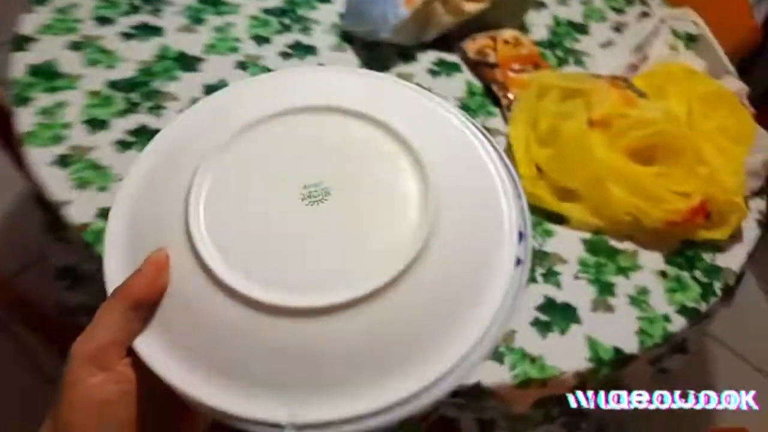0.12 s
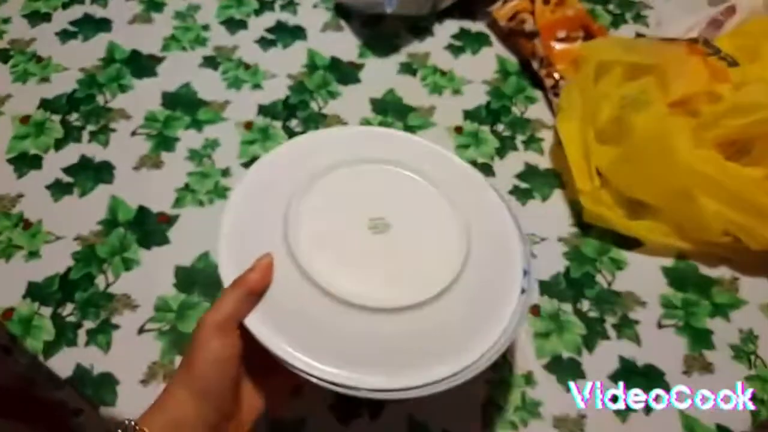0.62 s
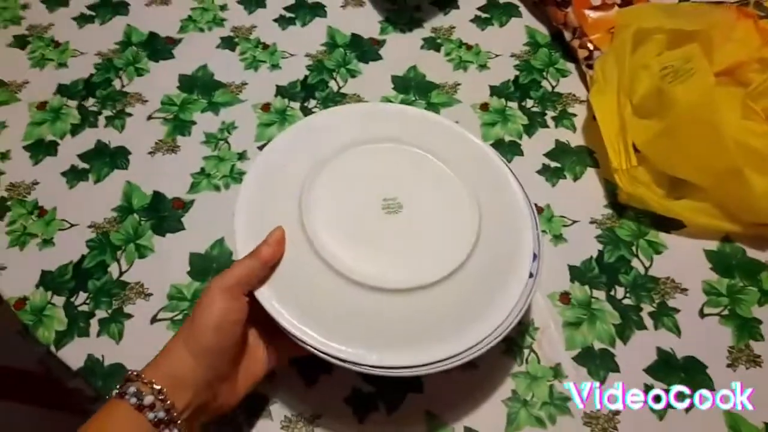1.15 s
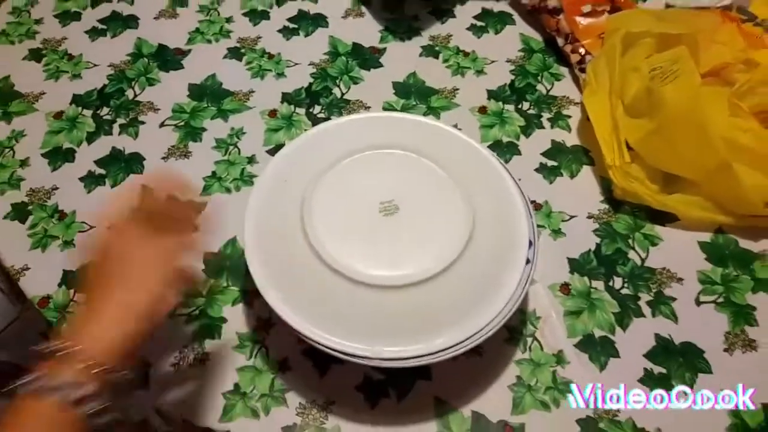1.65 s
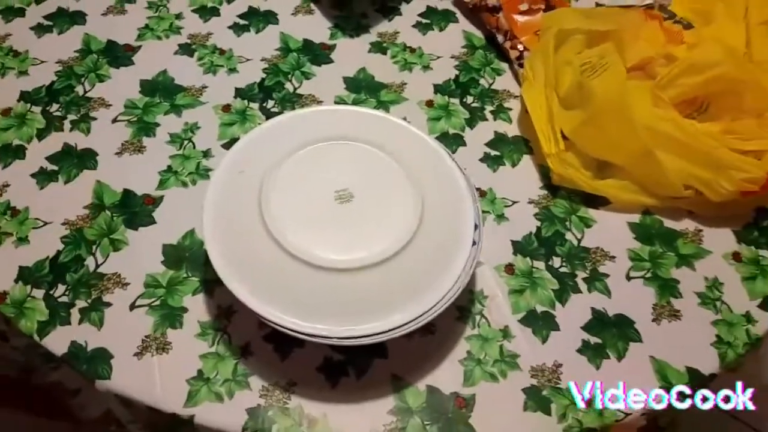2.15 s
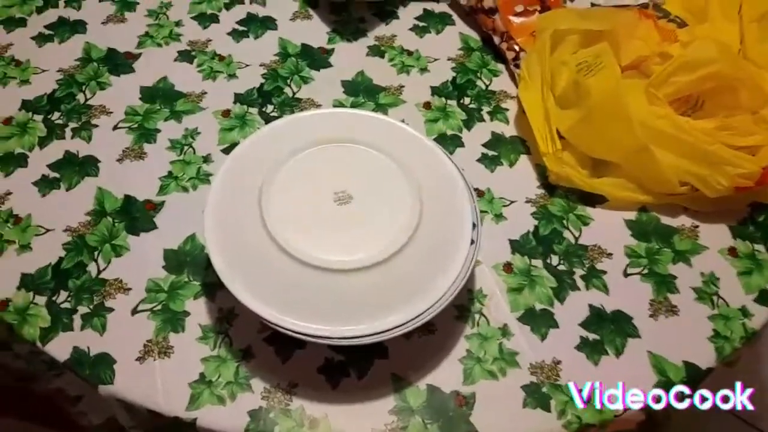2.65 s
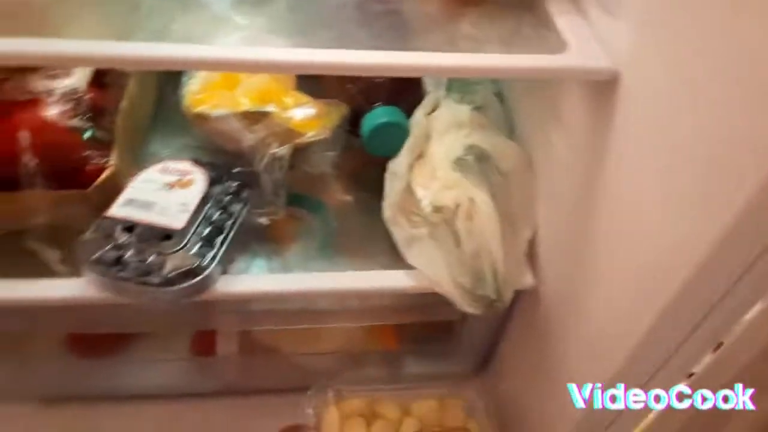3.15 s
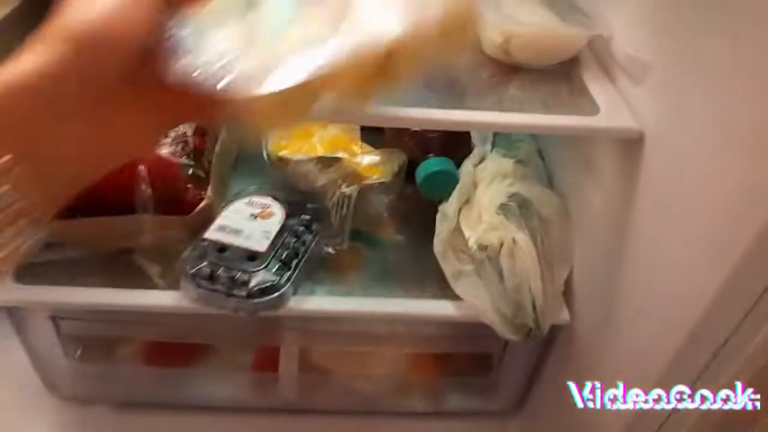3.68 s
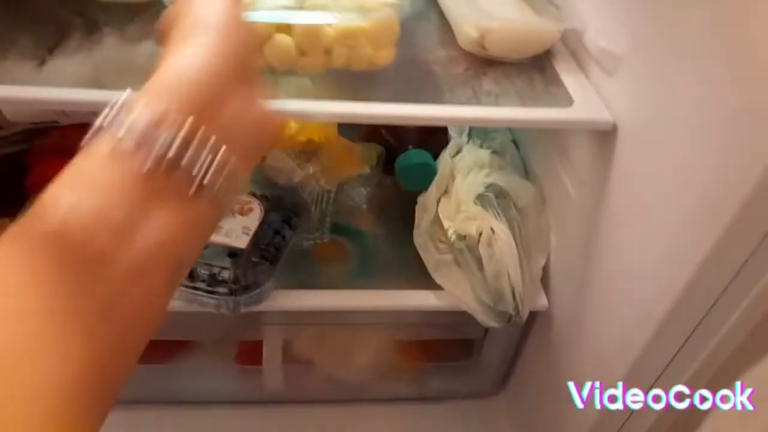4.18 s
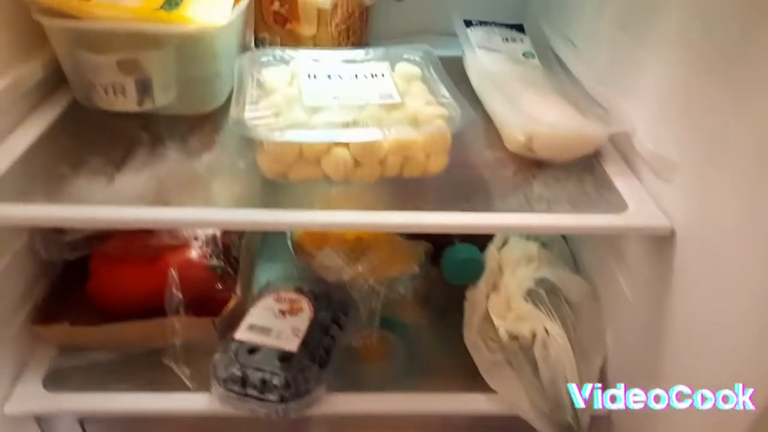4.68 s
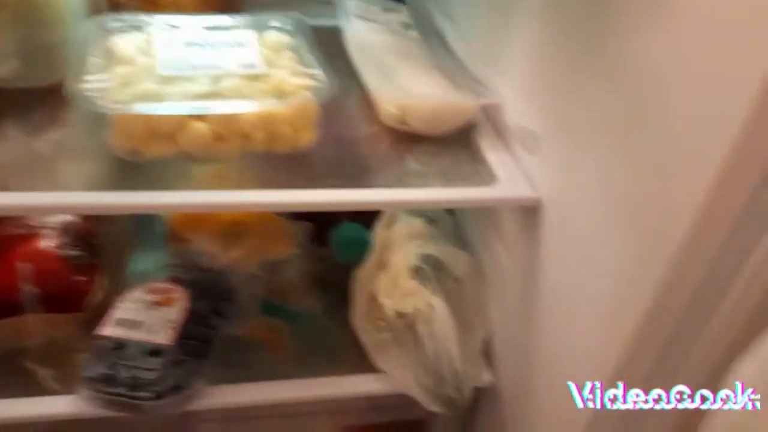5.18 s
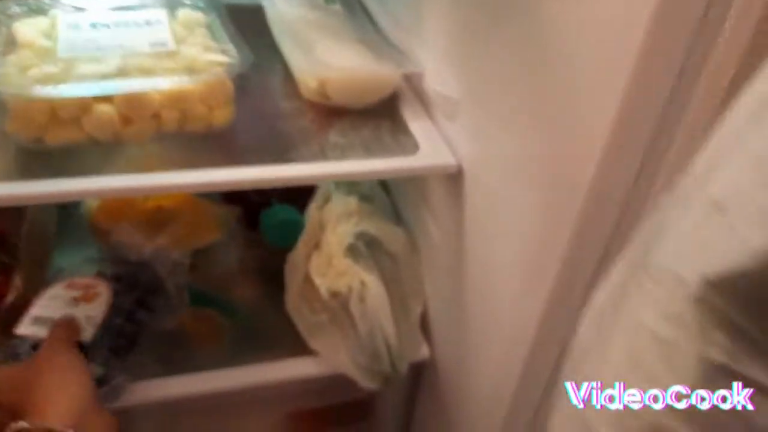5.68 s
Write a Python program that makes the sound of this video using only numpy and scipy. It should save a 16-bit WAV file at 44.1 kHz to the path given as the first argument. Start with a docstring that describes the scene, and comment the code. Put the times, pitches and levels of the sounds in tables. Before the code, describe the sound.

In a home kitchen, close handheld stereo microphone: a soft puff of air and rubbing, then a small stack of plates thuds onto a cloth-covered table, drags briefly and clacks sharply. Tiny bracelet beads tick. A short total silence follows, then a louder low fridge hum with a thin plastic tray crackling, knocking onto a shelf twice, and settling into near-quiet humming with a few faint late ticks.

```python
"""A puff of air and soft rubbing over a faint hum: a small stack of plates swings down, lands on a covered
table, drags and clacks; bracelet beads tick. After a short silence, at an open humming fridge, a plastic
tray crackles and is bumped onto a shelf. Blows ring decaying modes, ticks and snaps are resonant noise
bursts, friction and air are shaped noise, the hum is wavering sines. Two spaced microphone ports."""
import sys
import numpy as np
from scipy import signal
from scipy.fft import rfft, irfft, next_fast_len
from scipy.io import wavfile
from scipy.ndimage import map_coordinates

SR = 44100
rng = np.random.default_rng(int(sys.argv[2]) if len(sys.argv) > 2 else 0)


def ratio(d):
    """dB to gain"""
    e = np.asarray(d, float) / 20
    return 10 ** e


def put_to_file(sound):
    """Save the sound as 16-bit audio at rate SR, in the file named by the first command-line argument."""
    columns = np.atleast_2d(sound).T  # one column per channel
    safe = np.clip(columns, -1, 1)
    whole_steps = np.round(safe * 32767)
    wavfile.write(sys.argv[1], SR, whole_steps.astype(np.int16))


N = 256662


def unit(x):
    """Scaled to rms 1."""
    return x / np.sqrt(np.mean(x ** 2) + 1e-20)


def peak(x):
    """Scaled to peak 1."""
    return x / np.abs(x).max()


def along(points, hz):
    """(Hz, value) points read on a log axis."""
    f, v = np.transpose(points)
    return np.interp(np.log(hz + 1), np.log(f + 1), v)


def wobble(rate_hz):
    """Smooth random curve, rate_hz knots a second."""
    knots = rng.standard_normal(int(N * rate_hz / SR) + 4)
    return map_coordinates(knots, [np.arange(N) * rate_hz / SR])


def filtered(x, response):
    """x times a response of frequency."""
    m = next_fast_len(x.shape[-1] + 8192)
    spectrum = rfft(x, m) * response(np.fft.rfftfreq(m, 1 / SR))
    return irfft(spectrum, m)[..., :x.shape[-1]]


def add(track, s, sound):
    """Lay a sound into a track at time s."""
    at = round(s * SR)
    track[..., at:at + sound.shape[-1]] += sound[..., :N - at]


def resonances(peaks):
    """Causal response of (Hz, width Hz, dB) resonances, signs alternating."""
    def response(f):
        total = 0
        for k, (centre, width, db) in enumerate(peaks):
            total = total + (-1) ** k * ratio(db) * 1j * f * width / (centre ** 2 - f * f + 1j * f * width)
        return total
    return response


def strokes(rows):
    """Summed gains, one per dB column: each stroke swells to its peak and fades at steady dB rates."""
    t, total = np.arange(N) / SR, 0
    for s, *dbs, rise_s, fall_s in rows:
        shape_db = 20 * np.minimum((t - s) / max(rise_s, .002), (s - t) / max(fall_s, .002))
        total = total + ratio(np.array(dbs))[:, None] * ratio(np.maximum(shape_db, -200))
    return total


def ring(modes, level_db, attack_s):
    """Decaying modes, peak 1, each struck at a slightly new strength."""
    t = np.arange(SR // 2) / SR
    hz, db, t60 = np.transpose(modes)[:, :, None]
    db = db + level_db(hz) + rng.normal(0, 1.5, hz.shape)
    tones = ratio(db - 60 * t / t60) * np.sin(2 * np.pi * hz * t)
    return peak(tones.sum(0) * (1 - np.exp(-t / attack_s)) ** 2)


def click(centre_hz, t60_s, width):
    """Short noise burst through one resonance taken twice; width relative to centre."""
    t = np.arange(SR // 10) / SR
    decay = ratio(-60 * t / max(t60_s, .002))
    burst = decay * (1 - np.exp(-t / .0011)) * rng.standard_normal(len(t))
    band = resonances([(centre_hz, width * centre_hz, 0)])
    return peak(filtered(burst, lambda hz: band(hz) ** 2))


# left-right likeness of diffuse sound: f/Hz, likeness/1
LIKENESS = [(150, 0.99), (300, 0.71), (640, 0.16), (1300, 0.0), (12000, 0.0)]


def ports(pair):
    """Two unrelated signals mixed so that the ports share bass but not treble."""
    turn = lambda hz: np.arccos(np.clip(along(LIKENESS, hz), -1, 1)) / 2
    mid, side = filtered(pair, lambda hz: np.array([np.cos(turn(hz)), np.sin(turn(hz))]))
    return np.array([mid + side, mid - side])


def rush(spectrum, grain_db=0):
    """Diffuse noise of rms 1; grain makes it gritty."""
    grit = ratio(grain_db * wobble(460))
    noise = ports(grit * rng.standard_normal((2, N)))
    return unit(filtered(noise, lambda hz: ratio(along(spectrum, hz))))


# kitchen decay: f/Hz, t60/s
KITCHEN_T60 = [(150, .45), (1000, 0.49), (5000, 0.43), (14000, 0.3)]


def placed(x, wet_db, scatter_db, pan_db=0, lag_s=0):
    """Direct sound, scatter off hand and nearby surfaces (opposite at the ports), and kitchen tail."""
    pan = ratio([[pan_db / 2], [-pan_db / 2]])
    lag = lambda hz: np.exp(1j * np.pi * hz * lag_s * np.array([[-1], [1]]))
    out = filtered(x, lambda hz: pan * lag(hz))
    step, t = SR // 4, np.arange(SR // 50) / SR
    for at in range(0, N, step):  # scatter and tail drawn anew every quarter second
        if np.abs(x[at:at + step]).max() > 1e-5:
            hz, frames_s, z = signal.stft(rng.standard_normal((2, SR // 2)), SR, nperseg=256)
            decay = ratio(-60 * frames_s / along(KITCHEN_T60, hz)[:, None])
            tail = ports(signal.istft(z * decay, SR, nperseg=256)[1])
            tail *= ratio(wet_db) / np.linalg.norm(tail[0])
            scatter = rng.standard_normal(len(t)) * ratio(-60 * t / .006)
            scatter /= np.linalg.norm(scatter)
            scatter = filtered(scatter, lambda hz: (1j * hz / (450 + 1j * hz)) ** 2)
            tail[:, :len(t)] += ratio(scatter_db) * scatter * [[1], [-1]]
            add(out, at / SR, signal.fftconvolve(x[None, at:at + step], tail, axes=1))
    return out


def hum(lines, waver_db, drift_rad):
    """Motor tones that waver in level and phase."""
    t, total = np.arange(N) / SR, 0
    for hz, db in lines:
        level = np.sqrt(2) * ratio(db + waver_db * wobble(3.4))
        total = total + level * np.sin(2 * np.pi * hz * t + drift_rad * wobble(5.5))
    return total


# silent cut between table and fridge: off/s, on/s
SILENCE_S = (2.552, 2.716)
# hum at the table: f/Hz, level/dB rms
HUM_FAR = [(150.7, -65.5), (301.5, -65), (446.8, -80), (1545, -91)]
# hum at the open door: f/Hz, level/dB rms while the drone stands at AIR_NEAR_DB
HUM_NEAR = [(48.4, -77), (150.7, -45.5), (247.6, -64), (296.1, -58), (446.8, -71.5), (925.9, -80),
            (2650, -95), (4750, -96)]
# room noise colour at the table: f/Hz, relative density/dB per Hz
AIR_FAR = [(15, -64.5), (25, -35.5), (48, -14), (119, -14.5), (140, -5), (175, -9), (266, -10), (297, -9),
           (326, -18), (453, -18.5), (534, -27), (1030, -30.5), (1580, -39.5), (2000, -44), (2600, -68.5),
           (4400, -120)]
# room noise colour at the door: f/Hz, relative density/dB per Hz
AIR_NEAR = [(15, -44), (28, -24), (48, -2), (76, -24.5), (103, -2.5), (125, -9.5), (151, -10), (185, -22),
            (244, -9), (270, -24.5), (300, -10), (335, -28.5), (452, -30), (600, -36.5), (945, -39),
            (1500, -51), (2200, -85)]
# course of the near drone: t/s, level/dB
DRONE = [(2.72, -47.5), (3.4, -50.5), (3.65, -47), (3.8, -49.5), (4.4, -48), (4.8, -50.5), (5.3, -48),
         (5.7, -50), (5.82, -45)]
# faint banded treble: f/Hz, relative density/dB per Hz
HISS = [(880, -41), (1500, -11), (2140, -8), (2640, -5.5), (3060, -11), (4550, -12.5), (5540, -17),
        (6630, -11.5), (8240, -26.5), (9560, -11), (11500, -15), (13900, -14), (16000, -20.5)]
AIR_FAR_DB, AIR_NEAR_DB, HISS_DB = -60.5, -46, -78.5


def fridge():
    """Motor hum and room noise, faint at the table, strong at the open door; faint hiss throughout."""
    t = np.arange(N) / SR
    drone_s, drone_db = np.transpose(DRONE)
    swell_db = np.interp(t, drone_s, drone_db, left=-150) - AIR_NEAR_DB
    far = hum(HUM_FAR, waver_db=3, drift_rad=1.5) + ratio(AIR_FAR_DB) * rush(AIR_FAR)
    near = hum(HUM_NEAR, waver_db=0.5, drift_rad=1.5) + ratio(AIR_NEAR_DB) * rush(AIR_NEAR)
    return np.where(t > SILENCE_S[0], ratio(swell_db) * near, far) + ratio(HISS_DB) * rush(HISS)


# swing of the stack: peak t/s, level/dB, rise/s per 20 dB, fall/s per 20 dB
SWING = [(.11, -51, .2, .17)]
# its air noise: f/Hz, relative density/dB per Hz
SWING_AIR = [(30, -30), (60, -10), (140, 0), (220, -15), (400, -50)]


def swing():
    """Low rush of air pushed past the ports as the stack swings down."""
    return strokes(SWING)[0] * rush(SWING_AIR)


# bracelet shifting: peak t/s, level/dB, rise/s per 20 dB, fall/s per 20 dB
JINGLE = [(.79, -68, .12, .3), (1.94, -67, .06, .04), (1.97, -62, .04, .04), (2.005, -62, .05, .17),
          (2.138, -63, .008, .03)]
# its colour: f/Hz, relative density/dB per Hz
SHIMMER = [(2500, -40), (5500, -14), (7000, -5), (8400, -12), (10000, 0), (14200, 0), (16000, -12)]


def bracelet():
    """Gritty bright shimmer of many beads shifting on the wrist."""
    return strokes(JINGLE)[0] * rush(SHIMMER, grain_db=2.5)


# bead ticks: t/s, peak level/dB, centre f/Hz
BEADS = [(1.9834, -33.5, 10090), (2.0009, -38, 13700), (2.0477, -48, 12940), (2.0634, -47, 12830),
         (2.1234, -55, 7000), (2.1311, -46, 13670), (2.3744, -60.5, 14300)]


def beads():
    """Tiny bright ticks of a bracelet: resonant noise bursts."""
    out = np.zeros(N)
    for s, db, centre_hz in BEADS:
        add(out, s, ratio(db) * click(centre_hz, t60_s=0.0059, width=0.65))
    return out


def rubbing(rows, spectrum, grain_db, split_hz):
    """Gritty friction noise: heavy contact scrapes low, light contact fizzes high."""
    noise = rush(spectrum, grain_db)
    scrape = filtered(noise, lambda hz: 1 / (1 + (hz / split_hz) ** 3))
    scrape_gain, fizz_gain = strokes(rows)
    return scrape_gain * unit(scrape) + fizz_gain * unit(noise - scrape)


# strokes of plates, cloth, sleeve: peak t/s, scrape level/dB, fizz level/dB, rise/s, fall/s per 20 dB
CLOTH_STROKES = [(.1, -48, -43, 0.2, .15), (.926, -58, -84, 0.02, 0.1), (1.02, -49.5, -76, 0.0165, 0.1),
                 (1.062, -54, -69, 0.06, 0.19), (1.42, -49, -84, .08, .07), (1.455, -53, -78, 0.07, 0.0229)]
# cloth colour: f/Hz, relative density/dB per Hz
CLOTH = [(240, -41.5), (400, -12.5), (687, -17), (906, -7), (994, -11), (1730, -6), (2090, -8.5),
         (13300, -8), (16000, -8.5)]


def cloth_rubbing():
    """Friction of plates, cloth and sleeve."""
    return rubbing(CLOTH_STROKES, CLOTH, grain_db=2.2, split_hz=2400)


# strokes of plastic film: peak t/s, scrape level/dB, fizz level/dB, rise/s, fall/s per 20 dB
FILM_STROKES = [(2.73, -55.5, -64.5, .05, .1), (2.778, -49, -60, .04, .03), (2.815, -48, -56, .012, .05),
                (2.845, -45, -56, .03, .05), (2.888, -47, -56.5, 0.043, .015),
                (2.915, -29, -48, 0.0055, 0.023), (3.039, -45.5, -52, 0.13, 0.097),
                (3.232, -56, -53, 0.1, 0.13), (3.475, -77, -62, .008, 0.075),
                (3.528, -65, -78, 0.11, 0.095), (3.558, -76, -63.5, .008, 0.24),
                (3.757, -72, -61, .04, .06), (3.81, -51, -56.5, .025, 0.059), (3.876, -50, -59, .02, 0.041),
                (3.908, -35.5, -40, .005, 0.032), (3.93, -47, -49.5, .01, 0.14),
                (4.052, -51, -54, 0.036, .05), (4.16, -59, -57, .12, .1), (4.204, -53, -54, .04, .02),
                (4.222, -32, -46, .005, 0.031), (4.267, -44, -46, 0.018, 0.071),
                (4.363, -55.5, -61.5, .1, 0.054), (4.41, -75, -69.5, 0.043, 0.26),
                (5.544, -69, -77, 0.044, .25), (5.642, -63, -55.5, 0.0081, 0.1),
                (5.706, -61, -70, .08, .08), (5.82, -67, -57.5, 0.13, .1)]
# film colour: f/Hz, relative density/dB per Hz
FILM = [(240, -36), (400, -1), (687, -8), (1090, -6.5), (1730, -13.5), (2090, -12.5), (4650, -12),
        (5960, -15.5), (13900, -12.5), (16000, -22)]


def film_rubbing():
    """Friction of plastic film."""
    return rubbing(FILM_STROKES, FILM, grain_db=2.5, split_hz=3400)


# stack dragged over the table top: peak t/s, level/dB, rise/s per 20 dB, fall/s per 20 dB
DRAG = [(1.375, -42, .01, .1), (1.408, -32, .07, .09), (1.458, -37, .04, .01)]
# table top modes, also rung by thumps(): f/Hz, level/dB, t60/s
TABLE = [(67.4, -22.5, 0.47), (131.1, -7, 0.34), (171.3, -7, 0.17), (237, -2.5, 0.15), (280, -6, 0.14),
         (310, 8.5, 0.035), (317, -1.5, .22), (347.9, -4.5, .22), (444, -11.5, 0.11), (719, -20.5, 0.088),
         (802, -19, 0.13)]


def drag():
    """Dull friction noise that keeps the table top's modes sounding."""
    bands = []
    for hz, db, t60 in TABLE:
        bands.append((hz, 4.4 / t60, db + 12 * np.log10(t60) - 6 * (hz < 200)))
    board = resonances(bands)
    dull = lambda hz: board(hz) / (1 + 1j * hz / 450) ** 3
    return strokes(DRAG)[0] * unit(filtered(rng.standard_normal(N), dull))


def knocks(events, modes, attack_s, softer=0):
    """Soft blows ring a board; bass weight lifts its low modes and dulls its high ones."""
    out = np.zeros(N)
    for s, db, bass_db in events:
        weight_db = lambda hz: bass_db * (hz < 200) - 0.9 * (bass_db + 6) * (hz > 600)
        # attack_s holds at -15 dB; softer: dB longer per dB weaker
        blow_attack_s = max(attack_s * ratio(softer * (-15 - db)), .0005)
        add(out, s, ratio(db) * ring(modes, weight_db, blow_attack_s))
    return out


# blows on the table top: t/s, peak level/dB, bass weight/dB
THUMPS = [(0.921, -21, 5), (0.953, -27.5, 2), (1.011, -14, 4), (1.046, -29, -2.5), (1.083, -31, 3.5),
          (1.466, -11, -13), (1.502, -17.5, -8)]


def thumps():
    """Blows on the covered table top; weak ones land more softly."""
    return knocks(THUMPS, TABLE, attack_s=0.0024, softer=.4)


# bumps on the shelf: t/s, peak level/dB, bass weight/dB
BUMPS = [(2.905, -26, 9.5), (2.915, -31, 2), (3.817, -30.5, -10.5), (3.867, -29, -6), (3.882, -30, -6),
         (3.9055, -13.5, 4), (4.214, -16, -4), (4.225, -19.5, 3), (4.264, -28.5, -1), (5.54, -33, 7.5)]
# shelf modes: f/Hz, level/dB, t60/s
SHELF = [(60.1, -15, 0.1607), (108.6, -10, 0.27), (146, -7, .2), (206.1, -1.5, 0.13), (234.2, 1.5, 0.12),
         (284.8, -8, 0.14), (384, -13, 0.06), (464, -9.5, 0.063), (724, -20.5, 0.12), (930, -29.5, 0.11),
         (1240, -19, 0.033)]


def bumps():
    """The tray's blows ring the shelf's modes, all with one attack."""
    return knocks(BUMPS, SHELF, attack_s=.0018)


# plate against plate: t/s, level/dB, tilt/dB per octave
CLACKS = [(1.0496, -38, -7.5), (1.4159, -44, -8), (1.466, -8.5, -2.1), (1.4845, -25, -4),
          (1.5023, -19.5, -1.5)]
# plate modes: f/Hz, level/dB, t60/s
PLATES = [(1207, -13.5, 0.021), (1461, -19, .04), (1933, -14, .03), (2200, -10, .1), (2370, -14, 0.08),
          (2700, -13, 0.05), (3100, -13, 0.07), (3310, -16, .06), (3580, -10, .03), (3860, -11, 0.05),
          (4172, -8, .03), (4700, 1, 0.016), (5128, -9, 0.065), (6240, -14, .06), (6880, -15, 0.043),
          (8790, -24.5, 0.046), (10340, -14.5, 0.028), (11000, -14.5, 0.065), (12600, -22, .04)]
# rim sliding on plate: peak t/s, level/dB, rise/s per 20 dB, fall/s per 20 dB
SLIDE = [(1.234, -60, .003, .07), (1.262, -59, .04, .07), (1.372, -57, .004, .1)]
# bands of the sliding rim: f/Hz, level/dB
RIM = [(1130, 0), (1500, -6), (1910, -13), (2400, -13), (4640, -20), (6820, -21)]
RIM_WIDTH_HZ = 100


def plates():
    """Contacts ring the stack under a noise crack of like tilt; a sliding rim sings in narrow bands."""
    out, t = np.zeros(N), np.arange(SR // 2) / SR
    for s, db, tilt in CLACKS:
        slope_db = lambda hz: (tilt - 1.5) * np.log2((hz + 500) / 4000)
        noise = filtered(rng.standard_normal(len(t)), lambda hz: ratio(slope_db(hz)))
        crack = 1.5 * ratio(-60 * t / 0.026) * noise * (1 - np.exp(-t / 0.0015))
        add(out, s, ratio(db - 7) * (ring(PLATES, slope_db, attack_s=0.00033) + crack))
    rim = resonances([(hz, RIM_WIDTH_HZ, db) for hz, db in RIM])
    uneven = ratio(3 * wobble(150)) * rng.standard_normal(N)
    return out + strokes(SLIDE)[0] * unit(filtered(uneven, rim))


# plastic snaps: t/s, level/dB, centre f/Hz, hollow level/dB re snap, hollow f/Hz
SNAPS = [(2.7372, -39, 2470, -19.5, 890), (2.759, -53, 1500, 8, 900), (2.772, -44, 4000, -10, 1000),
         (2.7755, -49, 1500, 11, 1050), (2.7815, -50, 1500, 11, 900), (2.805, -29, 7000, -12, 600),
         (2.833, -30, 4744, -12, 940), (2.8445, -44, 1500, 10, 980), (2.8983, -21, 1490, -1, 873),
         (2.905, -28, 2800, -4, 990), (2.9307, -42, 1500, -5, 855), (2.9719, -28.5, 5230, -24, 910),
         (3.0096, -36, 1900, 4, 1166), (3.02, -43, 2000, 6, 1150), (3.0294, -42, 2000, 5, 1150),
         (3.041, -41, 2000, 5, 1150), (3.0542, -42.5, 1870, 4.5, 1100), (3.066, -46, 1870, 6, 1150),
         (3.469, -51, 13780, -20, 460), (3.5543, -49, 12700, -25, 487), (3.6162, -44, 12050, -24.5, 451),
         (3.8015, -56, 1800, 10, 1800), (3.816, -28, 3000, 1, 1770), (3.8215, -38, 1520, 4, 1040),
         (3.867, -44.5, 1700, 6, 550), (3.899, -16, 2800, -7, 1390), (3.9019, -33, 1550, 3, 655),
         (3.9487, -43.5, 1500, 2, 630), (4.0153, -43.5, 1806, -8, 816), (4.0488, -37, 2150, -5, 1030),
         (4.1363, -44, 1510, -28, 460), (4.2085, -29, 2150, -7, 443), (4.2134, -23, 3000, -2, 1010),
         (4.231, -40, 2100, 4, 2050), (4.2637, -42, 3580, 3, 790), (4.2894, -39, 3500, -2, 900),
         (4.3105, -44, 2500, 0, 700), (4.3641, -46, 1580, -2, 802), (4.4651, -51, 14100, -14, 458),
         (5.5382, -58, 1900, 10.5, 495), (5.6423, -38, 13370, -27, 470), (5.6983, -43.5, 1890, -4, 860),
         (5.7174, -47, 3390, -6, 800)]


def tray():
    """Each plastic snap also sounds, for longer, the tray's hollow, whose pitch moves as it flexes."""
    out = np.zeros(N)
    for s, db, centre_hz, hollow_db, hollow_hz in SNAPS:
        t60_s = 0.018 * ratio(.05 * (db + 35.5))  # stronger snaps last longer
        hollow = ratio(hollow_db) * click(hollow_hz, 1.6 * t60_s, width=0.3)
        add(out, s, ratio(db) * (click(centre_hz, t60_s, width=1.55) + hollow))
    return out


def scene():
    """Table, then fridge, with a silent cut between."""
    table = swing() + bracelet() + cloth_rubbing()
    table += placed(beads(), wet_db=-6.0, scatter_db=-12.0, pan_db=10.0, lag_s=-0.000026)
    table += placed(thumps() + drag(), wet_db=-8, scatter_db=-6)
    table += placed(plates(), wet_db=-0.5, scatter_db=-2.0, pan_db=0.5)
    shelf = film_rubbing()
    shelf += placed(bumps(), wet_db=-8.5, scatter_db=-7.0)
    shelf += placed(tray(), wet_db=-10.5, scatter_db=0.0, pan_db=0.27)
    t = np.arange(N) / SR
    return (fridge() + table + shelf) * ((t < SILENCE_S[0]) | (t > SILENCE_S[1]))


def low_pass(x):
    """Removes everything above the highest recorded frequency."""
    return signal.sosfilt(signal.butter(12, 16660, fs=SR, output="sos"), x)


def record(dry):
    """The microphone rolls off deep bass (45 Hz) and the top (15.6 kHz)."""
    colour = lambda hz: (1j * hz / (45 + 1j * hz)) ** 2 / (1 + (hz / 15600) ** 40)
    return low_pass(filtered(dry, colour))


dry = scene()
out = record(dry)
put_to_file(out)
```